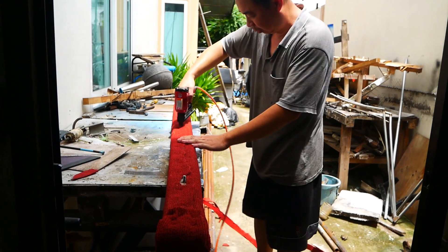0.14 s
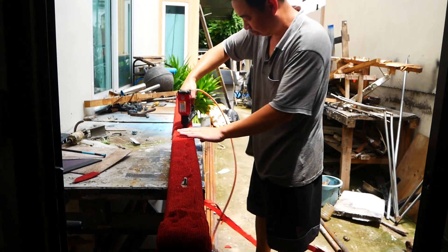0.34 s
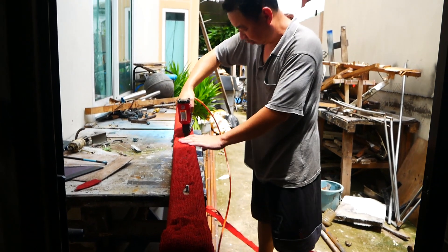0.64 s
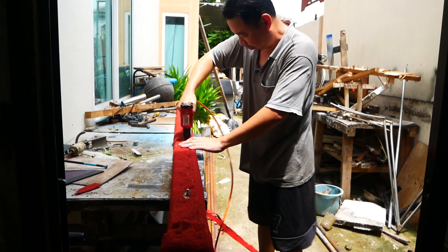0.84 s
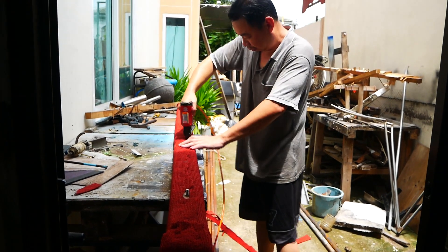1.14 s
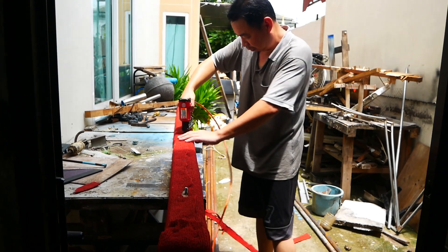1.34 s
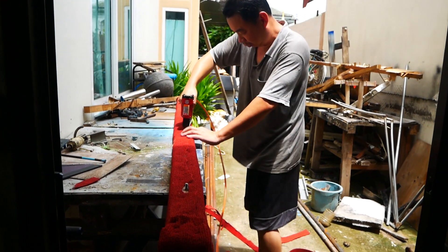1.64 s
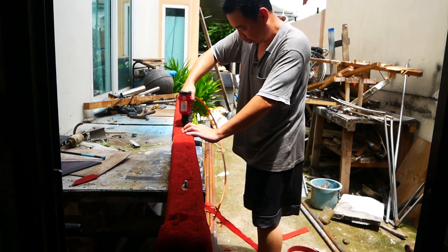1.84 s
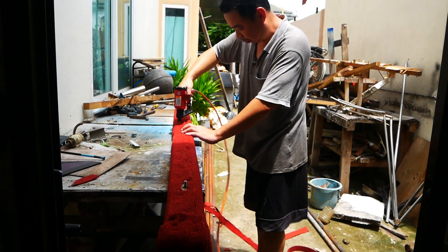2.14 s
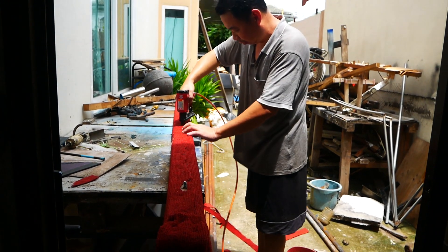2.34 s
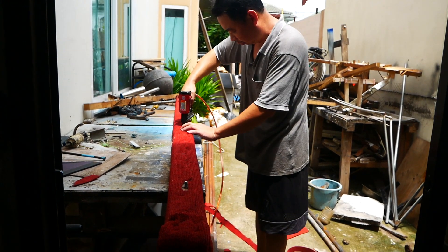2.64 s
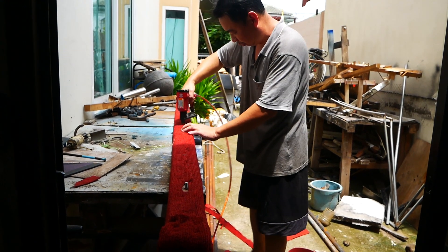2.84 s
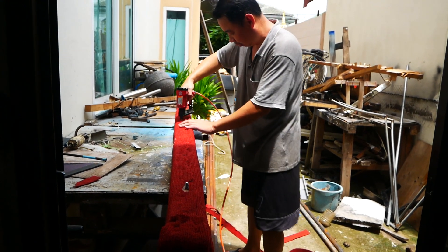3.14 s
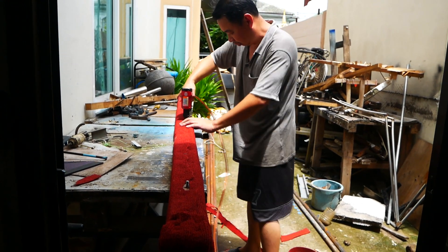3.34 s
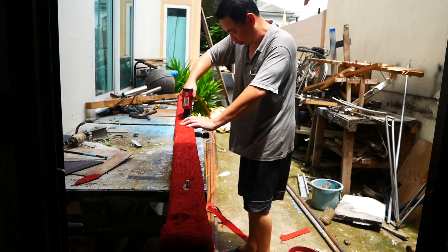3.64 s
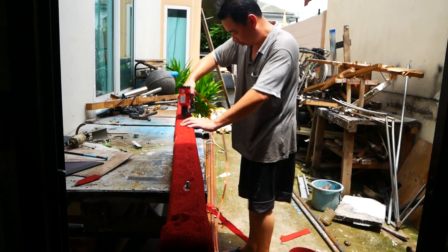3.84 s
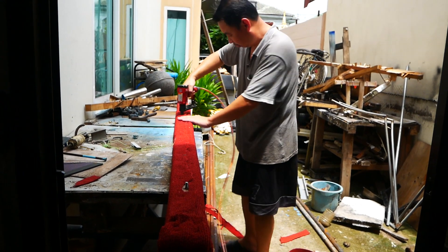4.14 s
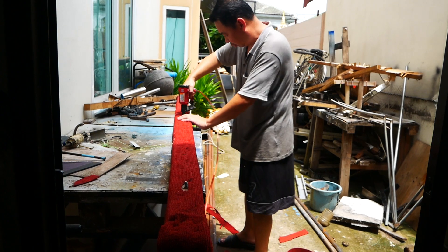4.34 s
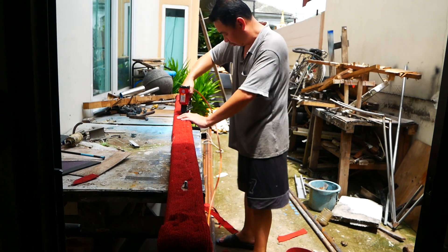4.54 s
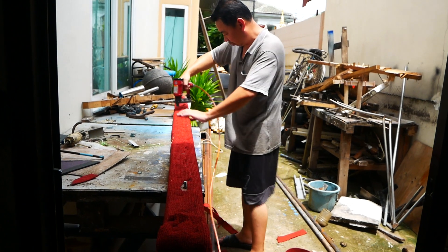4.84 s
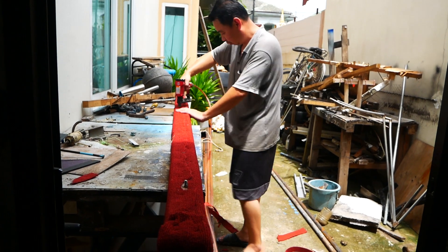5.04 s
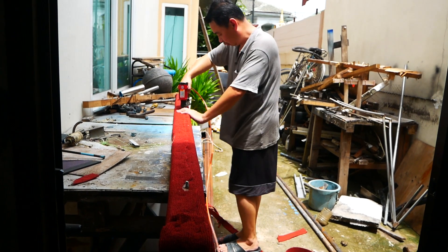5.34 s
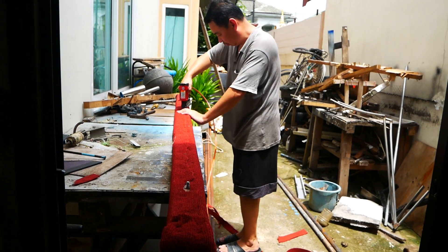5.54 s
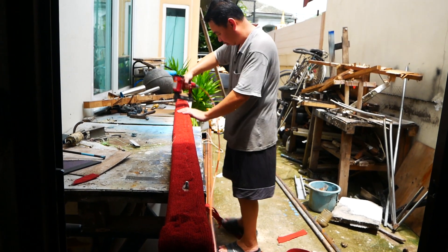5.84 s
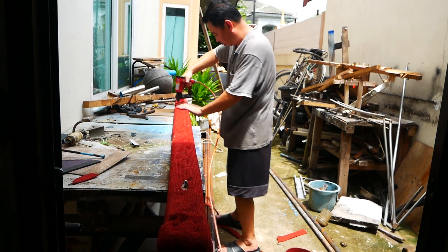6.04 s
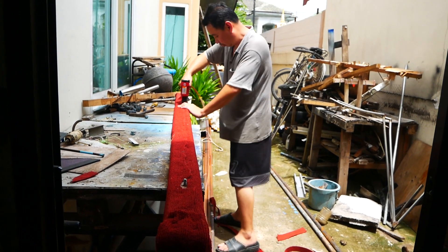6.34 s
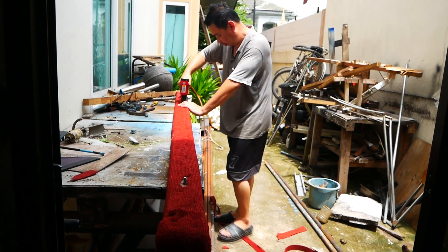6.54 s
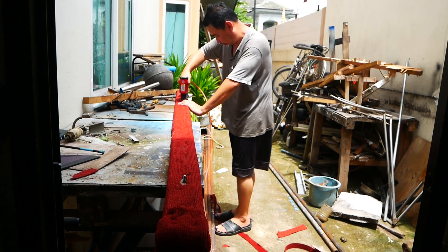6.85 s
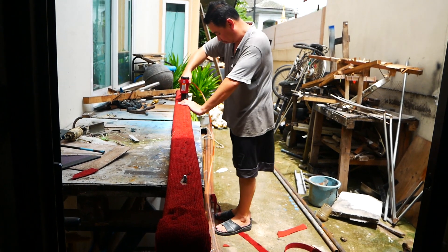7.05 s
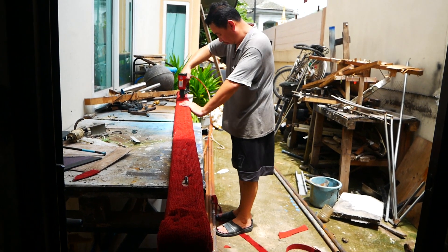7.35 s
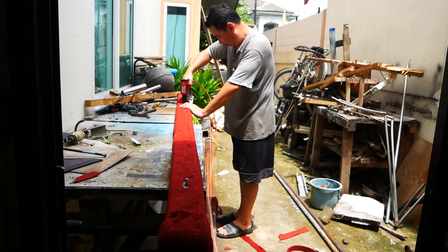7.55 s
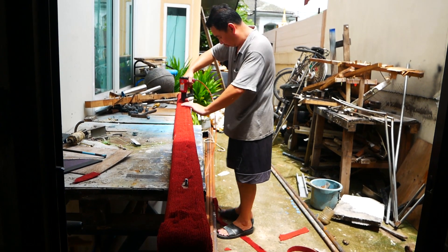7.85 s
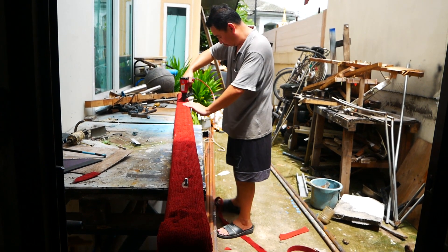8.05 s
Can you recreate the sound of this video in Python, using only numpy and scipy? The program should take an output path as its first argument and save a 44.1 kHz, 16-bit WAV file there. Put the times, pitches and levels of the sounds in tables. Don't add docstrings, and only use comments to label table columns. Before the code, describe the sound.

Uneven single cracks of a pneumatic stapler on wood, each followed by a bursting exhaust puff and click, with a low machine hum behind.

```python
import sys
import numpy as np
from scipy import signal
from scipy.fft import rfft, irfft, next_fast_len
from scipy.io import wavfile
from scipy.ndimage import uniform_filter1d

SR = 44100
rng = np.random.default_rng(int(sys.argv[2]) if len(sys.argv) > 2 else 0)


def undo_db(level):
    steps = np.asarray(level, float) / 20
    return 10 ** steps


def unload_wav(signal):
    wavfile.write(
        sys.argv[1],
        SR,
        np.round(np.clip(np.atleast_2d(signal).T, -1, 1) * 32767).astype(np.int16),
    )


N = 362061
LEAD = SR // 4

# (time [s], level [dB])
DRONE_LEVEL = [(0, -31), (1, -34), (2.5, -37), (4, -38.5), (5.5, -40.5), (7, -38), (8.21, -40.5)]
# (frequency [Hz], density [dB per Hz])
DRONE_SPECTRUM = [(18, -68.5), (30, -47.5), (101, -14), (195, -10), (239, -3.5), (433, 0), (520, -5.5),
                  (1080, -4), (1450, -9.5), (1860, -9), (2000, -13.5), (2190, -9.5), (7000, -22.5),
                  (9100, -33), (15400, -120)]
# (frequency [Hz], width [Hz], level [dB])
DRONE_RESONANCES = [(308, 52, 2), (390, 160, 0.5), (690, 15, 3.5), (770, 36, 0), (961, 20, 6.5),
                    (1016, 17, 4.5), (1813, 16, 8.5), (2080, 52, 3.5)]
# (frequency [Hz], density [dB per Hz])
LEAK_SPECTRUM = [(3000, -19), (5000, -18), (7000, -8), (8800, -2), (10000, 1.5), (11500, -6.5),
                 (13000, -22), (15500, -24)]
# (frequency [Hz], density [dB per Hz])
PORT_AIR_SPECTRUM = [(20, -26), (60, -9), (110, 2), (170, 2.5), (300, -21.5)]
# (time [s], level [dB], length [s])
PORT_GUSTS = [
    (1.62, -60, .15),
    (4.097, -59, 0.14),
    (6.975, -49.5, 0.07),
]
LEAK_DB, PORT_AIR_DB, DUCKED_DB = -49.5, -59.5, -55
HOLD_S, QUICK_S, SLOW_S, SLOW_SHARE, SINK_S = 0.12, 0.11, 0.49, 0.33, 0.53
AT_BLOW, AT_PUFF = 0.35, 0.52

# (time [s], puff level [dB], outflow level [dB], piston click level [dB])
EXHAUSTS = [
    (1.1113, -2, -1.5, -7),
    (1.8262, -3, -1.5, -7.5),
    (2.775, 1, -1, -6),
    (3.7817, -0.5, -0.5, -8),
    (4.684, 0, -0.5, -7),
    (5.735, 1.5, -1.5, -4.5),
    (7.145, -1, 1, -6),
    (7.7698, 0.5, 0.5, -1.5),
]
# (frequency [Hz], density [dB per Hz])
EXHAUST_SPECTRUM = [(120, -55), (200, -12.5), (529, -29), (1180, -44), (3620, -22), (4270, -14.5),
                    (6170, -17.5), (8120, -10), (9930, 1), (13300, -10), (16000, -26)]
# (frequency [Hz], density [dB per Hz])
OUTFLOW_SPECTRUM = [(590, -52), (1000, -12), (1370, -7), (1870, -11.5), (2530, -6.5), (3580, -8.5),
                    (5130, -6.5), (7880, -4), (10300, 4.5), (14600, -16), (16000, -30)]
# (frequency [Hz], level [dB], 60 dB decay [s])
CASING_MODES = [(5100, 3, 0.53), (5100, 1, .3), (5700, -4, .2), (7260, -3, .3)]
EARLIER_S, EARLIER_DB = -.085, 2.5
PUSH_DB, CASING_DB, PISTON_HOME_S = -38.5, -63, .0207

# (time [s], peak level [dB], 60 dB decay [s])
NOSE_TICKS = [
    (0.3994, -44.5, 0.06),
    (3.43, -40, 0.05),
    (5.0479, -38.5, 0.055),
    (5.343, -26.5, 0.12),
    (6.921, -18, 0.13),
    (7.5718, -19.5, 0.06),
]
# (frequency [Hz], density [dB per Hz])
CLICK_SPECTRUM = [(300, -20), (1000, -1.5), (2500, -7), (5200, -1), (7500, -6), (10500, 1.5), (15500, -22)]
# (time [s], length [s], first frequency [Hz], last frequency [Hz], level [dB])
BIRD_CALL = (0.8, 0.46, 3980, 3850, -50)

# (seep time [s], opening time [s], hiss level [dB], jump at opening [dB])
TRIGGER_PULLS = [
    (0.987, 0.995, -16, 2),
    (1.709, 1.719, -16, 2),
    (2.651, 2.6687, -15, 10),
    (3.66, 3.67, -17.5, 5),
    (4.561, 4.578, -17, 6.5),
    (5.602, 5.613, -18, 12.5),
    (7.021, 7.028, -18, 8),
    (7.606, 7.622, -19.5, 3.5),
    (8.201, 8.205, -23.5, 0),
]
# (frequency [Hz], density [dB per Hz])
VALVE_SPECTRUM = [(880, -43), (1500, -18), (2460, -16.5), (2880, -14), (4080, -10), (5220, -8), (6500, -5),
                  (11400, 1.5), (14200, -14), (16000, -22)]
SEEP_UNDER_DB, SAG_DB_PER_S, CUT_S = 14.5, 350, 0.0035

# (time [s], knock level [dB], rattle level [dB], board note [Hz], rebound level [dB])
BLOWS = [
    (1.0146, -5.5, 6, 1660, -2),
    (1.746, -5, 9, 1497, -4),
    (2.6897, -5.5, 1.5, 1785, -15),
    (3.693, -7, 4.5, 1477, -6),
    (4.597, -6.5, -3.5, 1536, -15),
    (5.6354, -8, -10, 1874, -4),
    (7.049, -5.5, 2.5, 1850, -13),
    (7.6387, -5, -6, 1453, -11),
]
# (frequency [Hz], density [dB per Hz])
KNOCK_SPECTRUM = [(500, -26), (1000, -24), (1500, -1.5), (2200, 4), (3300, -7), (4800, 9)]
# (frequency [Hz], density [dB per Hz])
STEEL_SPECTRUM = [(2200, -7), (3500, -7), (5200, 0), (6800, -8), (8500, -5)]
# (frequency [Hz], level [dB], 60 dB decay [s])
DRIVER_MODES = [(3900, -2.5, 0.0075), (5124, -0.5, 0.011), (5770, -6, 0.013), (9770, -10, 0.0054)]
# (frequency [Hz], density [dB per Hz])
CRACK_SPECTRUM = [(410, -41), (700, -1), (1770, -2), (2430, 0), (2960, -3.5), (4430, 0.5), (5120, -8),
                  (6230, -26.5), (10300, -3.5), (12600, -4), (16000, -33)]
# (frequency [Hz], density [dB per Hz])
SPIT_SPECTRUM = [(6000, -26), (8000, -9), (10400, 9), (13000, -16), (15800, -30)]
# (frequency [Hz], density [dB per Hz])
THUD_SPECTRUM = [(60, -49), (180, -9.5), (330, 4.5), (600, -18.5), (1200, 3.5), (3000, -61)]
# (frequency [Hz], level [dB], 60 dB decay [s])
BOARD_MODES = [(367, -9.5, 0.075), (997, 1, 0.028), (1387, 3, 0.06), (1570, 3, 0.03), (1915, 3.5, 0.057),
               (2076, 1, 0.06), (2310, -3, 0.039), (2720, -11, 0.066), (3160, -36, 0.029)]
STEEL_DB, DRIVER_DB, SPIT_DB, ECHO_DB = -11, -8, -7.5, -23.5
RING_UNDER_DB, THUD_UNDER_DB, NOTE_UNDER_DB, NOTE_T60_S = 16.5, 9, 21.5, 0.21
BOUNCE_S, BOUNCE_DB, REBOUND_S = 0.00373, -15.5, .0112
SLAM_DB, SLAM_LOW_HZ, SLAM_HIGH_HZ = 15.5, 252, 1930

# (frequency [Hz], 60 dB decay [s])
YARD_DECAY = [(150, 0.21), (500, 0.82), (1500, 0.37), (3000, 0.4), (6000, 0.4), (10000, 0.51),
              (15000, 0.21)]
# (frequency [Hz], density [dB per Hz])
ECHO_SPECTRUM = [(120, -51), (200, -9), (465, -12.5), (867, -9), (1400, 0), (4350, -6.5), (7680, -12.5),
                 (9930, -6.5), (14900, -31), (16000, -56)]
# (frequency [Hz], width [Hz], level [dB])
ECHO_RESONANCES = [(1430, 80, -4.5), (1880, 74, 4), (2350, 100, 2), (3400, 240, 1), (5200, 400, 5)]
STEP_DB = 7.5
NOTCH_HZ = 7850


def rms_one(x):
    return x / np.sqrt(np.mean(x ** 2) + 1e-20)


def at_hz(points, hz, column=1):
    points = np.array(points)
    return np.interp(np.log(hz + 1), np.log(points[:, 0]), points[:, column])


def coloured(spectrum, alike, peaks=()):
    size = next_fast_len(N)
    hz = np.arange(size // 2 + 1) * SR / size
    gain = undo_db(at_hz(spectrum, hz))
    for peak_hz, width_hz, peak_db in peaks:
        gain = gain * undo_db(peak_db / (1 + (2 * (hz - peak_hz) / width_hz) ** 2))
    noise = irfft(rfft(rng.standard_normal((2, size))) * gain, size)[:, :N]
    common, apart = [rms_one(part) for part in noise]
    return common + np.sqrt(np.clip(1 - alike, 0, 1)) * apart * [[1], [-1]]


def band_pass(x, low_hz, high_hz):
    return signal.sosfilt(signal.butter(2, [low_hz, high_hz], "band", fs=SR, output="sos"), x)


def clicks(s, db):
    out = np.full(N + LEAD, 1e-18)
    out[np.round(np.asarray(s) * SR).astype(int) + LEAD] = undo_db(np.asarray(db))
    return out


def dying(s, db, t60, rise_s):
    fall, rise = undo_db(-60 / (t60 * SR)), np.exp(-1 / (rise_s * SR))
    return signal.lfilter([1 - rise], np.convolve([1, -fall], [1, -rise]), clicks(s, db))[LEAD:]


def drift(rate):
    r = np.exp(-2 * np.pi * rate / SR)
    return rms_one(signal.lfilter([1], [1, -2 * r, r * r], rng.standard_normal(N + SR))[SR:])


def snap(s, db, t60, rise_s, spectrum, alike):
    burst = dying(s, 0, t60, rise_s) * coloured(spectrum, alike)
    at = np.clip(np.round(np.asarray(s) * SR).astype(int), 0, N)
    tops = [np.abs(burst[:, i:i + 300].mean(axis=0)).max() + 1e-9 for i in at]
    gains = undo_db(db) / tops
    latest = np.searchsorted(at, np.arange(N), side="right") - 1
    return burst * gains[np.clip(latest, 0, None)]


def struck(s, db, modes, spread_db):
    out, luck = 0, rng.normal(0, 1, (len(s), len(modes), 2))
    for k, (hz, mode_db, t60) in enumerate(modes):
        r, w = undo_db(-60 / (t60 * SR)), 2 * np.pi * hz / SR
        late_s = 0.00044 * np.abs(luck[:, k, 1])
        strike = clicks(s + late_s, db + mode_db + spread_db * luck[:, k, 0])
        ring = signal.lfilter([0, np.sin(w)], [1, -2 * r * np.cos(w), r * r], strike)[LEAD:]
        out = out + (-1) ** k * ring
    return out


def ducking():
    t, out = np.arange(N) / SR, np.zeros(N)
    hits = [EARLIER_S - .1] + [row[0] for row in BLOWS]
    puffs = [EARLIER_S + 0.053] + [row[0] for row in EXHAUSTS]
    for hit_s, puff_s in zip(hits, puffs):
        since = np.maximum(t - puff_s - HOLD_S, 0)
        quick = (1 - SLOW_SHARE) * np.exp(-(since / QUICK_S) ** 1.1)
        slow = SLOW_SHARE * np.exp(-since / SLOW_S)
        sunk = (t - hit_s) / SINK_S + AT_BLOW * (t > hit_s) + AT_PUFF * (t > puff_s)
        out = np.maximum(out, (quick + slow) * np.clip(sunk, 0, 1))
    return out


def background():
    t = np.arange(N) / SR
    drone_db = np.interp(t, *np.transpose(DRONE_LEVEL))
    duck_db = ducking() * (DUCKED_DB - drone_db)
    drone = undo_db(drone_db + duck_db + 0.59 * drift(28)) * coloured(DRONE_SPECTRUM, 0.96, DRONE_RESONANCES)
    leak_db = LEAK_DB + 1.08 * (drone_db + 37.5) + 1.04 * duck_db + 0.7 * drift(8.6)
    leak = undo_db(leak_db) * coloured(LEAK_SPECTRUM, alike=0.39)
    air = undo_db(PORT_AIR_DB) + sum(undo_db(db) * np.exp(-((t - s) / length) ** 2) for s, db, length in PORT_GUSTS)
    air = air * undo_db(0.17 * duck_db + 0.94 * drift(12.0))
    return drone + leak + air * coloured(PORT_AIR_SPECTRUM, alike=0.13)


def exhaust():
    now, puff_db, flow_db, click_db = np.transpose(EXHAUSTS)
    s, flow_db = np.r_[EARLIER_S, now], np.r_[EARLIER_DB, flow_db]
    puff = snap(now + 0.00065, puff_db + 0.44, 0.011, 0.00082, EXHAUST_SPECTRUM, 0.99)
    rush = dying(s, flow_db - 16.5, 0.1, 0.0021) * undo_db(2.5 * drift(250))
    rush = rush * coloured(EXHAUST_SPECTRUM, alike=0.75)
    ebb = dying(s, flow_db - 26.0, 0.46, 0.0026) * undo_db(0.65 * drift(60))
    ebb = ebb * coloured(OUTFLOW_SPECTRUM, 0.54, [(5280, 540, 4.4)])
    latch = snap(now + 0.00033, click_db - 7.5, 0.012, 0.00026, STEEL_SPECTRUM, 1.0)
    push = snap(now, PUSH_DB, 0.034, 0.00055, THUD_SPECTRUM, 0.95)
    home = snap(now + PISTON_HOME_S, click_db - 10.0, 0.014, 0.00032, CLICK_SPECTRUM, .7)
    ring = struck(s + PISTON_HOME_S, CASING_DB, CASING_MODES, spread_db=7.0)
    ring = ring * undo_db(3.5 * drift(80))
    return puff + latch + rush + ebb + push + home + ring


def ticks():
    s, db, _ = np.transpose(NOSE_TICKS)
    touch = snap(s, db - 12.5, 0.01, 0.0004, CLICK_SPECTRUM, .8)
    level = sum(dying([at], [top - 16], max(fall, .01), 0.0022) for at, top, fall in NOSE_TICKS)
    return touch + level * undo_db(2.5 * drift(400)) * coloured(CLICK_SPECTRUM, alike=.7)


def bird():
    s, length, from_hz, to_hz, db = BIRD_CALL
    u = np.clip((np.arange(N) / SR - s) / length, 0, 1)
    phase = 2 * np.pi * np.cumsum(from_hz + (to_hz - from_hz) * u) / SR
    return undo_db(db) * np.sqrt(np.sin(np.pi * u)) * np.sin(phase)


def valve():
    t, level = np.arange(N) / SR, np.zeros(N)
    cuts = [row[0] for row in BLOWS] + [N / SR]
    for (seep_s, open_s, db, jump_db), cut_s in zip(TRIGGER_PULLS, cuts):
        to_go = np.clip((open_s - t) / (open_s - seep_s), 0, 9)
        rising_db = -SEEP_UNDER_DB * to_go ** 1.1 - jump_db * (t < open_s)
        sag_db = SAG_DB_PER_S * np.maximum(t - open_s, 0)
        flowing = (t > seep_s - 0.002) * (t < cut_s + CUT_S)
        level += undo_db(db + rising_db - sag_db) * flowing
    level = uniform_filter1d(level, size=48)
    return level * undo_db(1.3 * drift(270)) * coloured(VALVE_SPECTRUM, alike=0.91)


def board_note():
    out, t = np.zeros(N), np.arange(SR // 3) / SR
    for s, knock_db, _, hz, _ in BLOWS:
        at = round((s + 0.00121) * SR)
        level = undo_db(knock_db - NOTE_UNDER_DB - 60 * t / NOTE_T60_S)
        out[at:at + len(t)] += level * np.sin(2 * np.pi * hz * t)
    return out * undo_db(3.5 * drift(70))


def blow():
    s, knock_db, rattle_db, _, rebound_db = np.transpose(BLOWS)
    s = s + 0.00066
    knock = snap(s + 0.00035, knock_db + 6.5, 0.017, 0.0003, KNOCK_SPECTRUM, .85)
    steel = snap(s, STEEL_DB, 0.0098, 0.00059, STEEL_SPECTRUM, 0.95)
    driver = struck(s + 0.0002, DRIVER_DB, DRIVER_MODES, spread_db=3.0)
    bounce = snap(s + BOUNCE_S, BOUNCE_DB, 0.021, 0.00058, CRACK_SPECTRUM, 0.75)
    spit = snap(s, SPIT_DB, 0.012, 0.00011, SPIT_SPECTRUM, 0.66)
    thud = snap(s, knock_db - THUD_UNDER_DB, 0.023, 0.0015, THUD_SPECTRUM, 0.83)
    slam = band_pass(clicks(s + 0.00069, knock_db + SLAM_DB), SLAM_LOW_HZ, SLAM_HIGH_HZ)[LEAD:]
    rattle = dying(s, rattle_db - 16.5, 0.04, 0.00095) * undo_db(2.1 * drift(570))
    rattle = rattle * coloured(CRACK_SPECTRUM, alike=0.98)
    rebound = snap(s + REBOUND_S, rebound_db - 4.0, 0.0081, 0.00075, CLICK_SPECTRUM, .8)
    ring = struck(s, knock_db - RING_UNDER_DB, BOARD_MODES, spread_db=7.0)
    return knock + steel + driver + bounce + spit + thud + slam + rattle + rebound + ring + board_note()


def blow_echo():
    s = np.transpose(BLOWS)[0]
    wash = [coloured(ECHO_SPECTRUM, .6, ECHO_RESONANCES) for _ in range(2)]
    edges, out = 125 * 2. ** np.arange(8), 0
    for k, (low, high) in enumerate(zip(edges, edges[1:])):
        band = band_pass(wash[k % 2], low, high) * undo_db(0.89 * drift(100))
        out = out + band * dying(s, ECHO_DB, at_hz(YARD_DECAY, np.sqrt(low * high)), 0.008)
    return out


def widened(ports, lateral, corner_hz):
    mid, apart = (ports[0] + ports[1]) / 2, (ports[0] - ports[1]) / 2
    side = signal.lfilter(*signal.butter(1, corner_hz, fs=SR), 1.2 * apart - lateral * mid) + 0.48 * apart
    side = side + signal.lfilter(*signal.butter(1, 4000, "high", fs=SR), 0.17 * mid)
    return np.array([mid + side, mid - side])


def scene():
    step = dying([row[0] for row in EXHAUSTS], 0, 3.0, 0.0019)
    drop = undo_db(-STEP_DB * np.minimum(step, 1) * (step > .7))
    tool = valve() + blow() + blow_echo() * drop + exhaust() + ticks() + bird()
    near = widened(tool, lateral=1.64, corner_hz=760)
    return near + widened(background(), lateral=1.83, corner_hz=1150)


def low_pass(x):
    return signal.sosfilt(signal.butter(12, 16440, fs=SR, output="sos"), x)


def record(dry):
    notched = signal.lfilter(*signal.iirnotch(NOTCH_HZ, 45, fs=SR), dry)
    cut = signal.sosfilt(signal.cheby2(12, 50, 16000, fs=SR, output="sos"), notched)
    mix = np.clip(1.776 * np.tanh(cut / 1.82), -1, 1)
    return low_pass(mix)


dry = scene()
out = record(dry)
unload_wav(out)
```